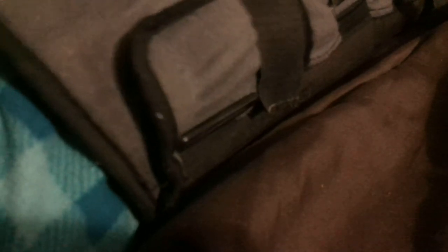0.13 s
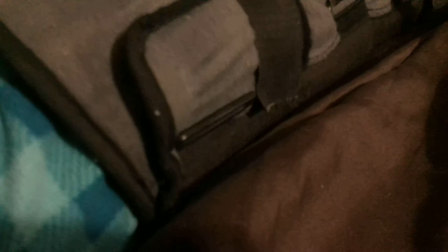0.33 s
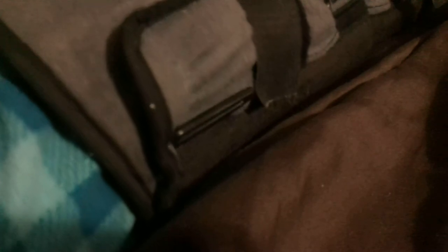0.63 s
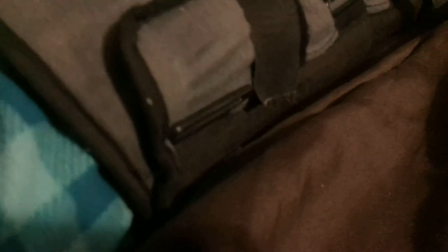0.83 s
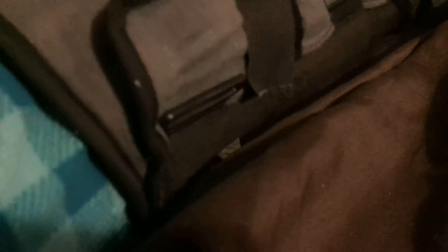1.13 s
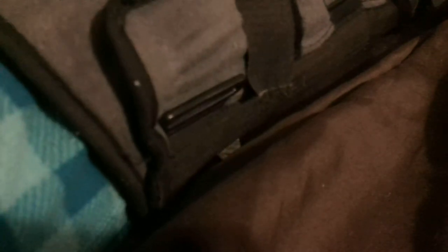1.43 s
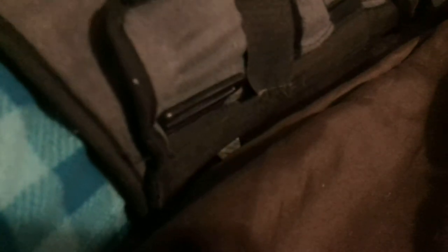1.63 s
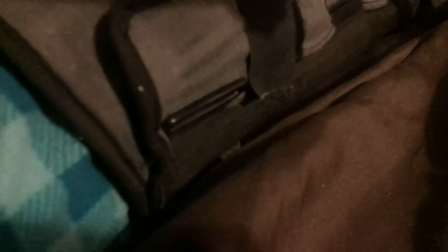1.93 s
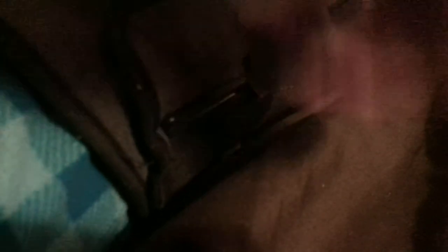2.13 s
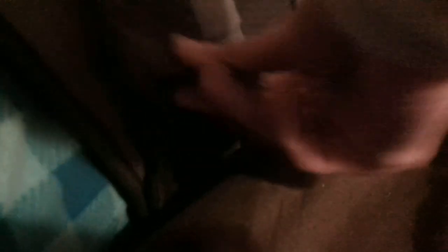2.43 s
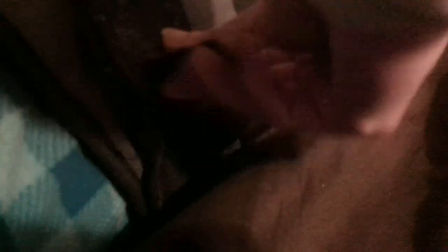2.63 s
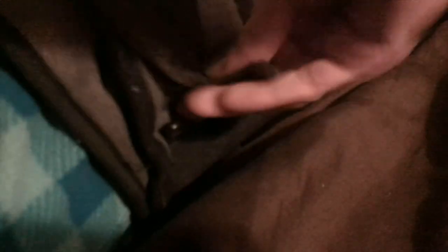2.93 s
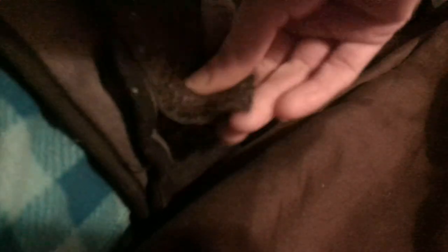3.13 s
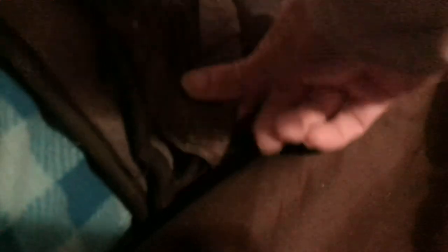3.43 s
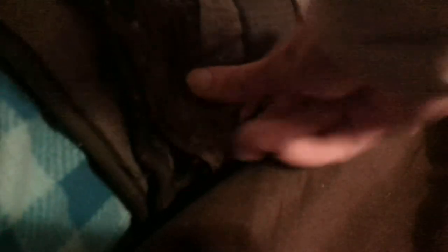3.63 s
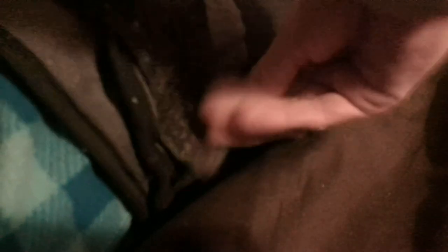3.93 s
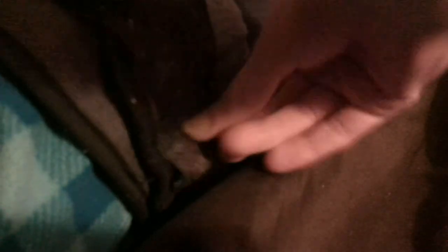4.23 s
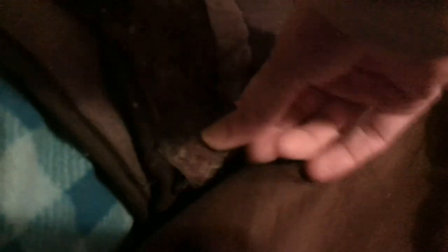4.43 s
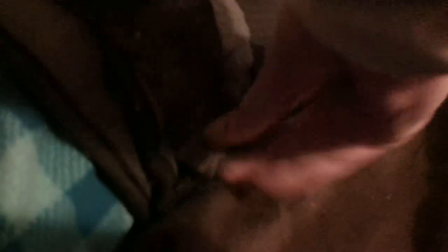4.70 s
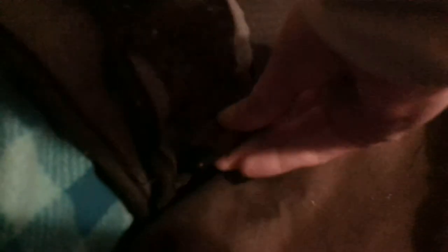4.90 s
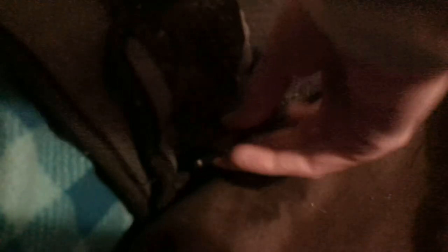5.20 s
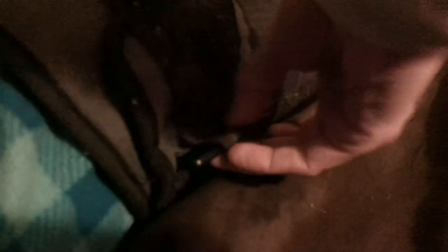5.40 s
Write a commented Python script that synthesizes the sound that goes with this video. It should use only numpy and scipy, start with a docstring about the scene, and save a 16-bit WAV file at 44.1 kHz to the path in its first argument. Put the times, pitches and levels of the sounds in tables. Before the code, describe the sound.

Starts mid-rip: a dense hook-and-loop rasp ends in a tenth of a second. Soft cloth rubbing and muted bumps of a padded leg brace follow, with a few faint ticks. A sharp little cluster of snaps comes before three seconds, then the strap is peeled in short crackling tugs. Close stereo microphone, action drifting right, small soft room with faint hum.

```python
"""First the end of a quick rip is heard: hooks part so densely that they fuse into a rasp.
Then cloth shifts softly and a padded leg brace bumps, made of low noise and short damped tones.
Last, a hook-and-loop strap is peeled in short tugs: sharp pulses are dry snaps over a fibre-noise rasp.
The sounds lie close and to the right in a small, soft room, over faint air and a mains hum."""
import sys
import numpy as np
from scipy import signal
from scipy.fft import rfft, irfft, next_fast_len
from scipy.io import wavfile
from scipy.ndimage import map_coordinates

SR = 44100
rng = np.random.default_rng(int(sys.argv[2]) if len(sys.argv) > 2 else 0)


def waveform_to_disk(signal):
    """Save audio, clipped to [-1, 1], as 16-bit WAV at the path in sys.argv[1]."""
    frames = np.transpose(np.atleast_2d(signal))
    scaled = np.clip(frames, -1, 1) * 32767
    samples = np.round(scaled).astype(np.int16)
    wavfile.write(sys.argv[1], SR, samples)


N = 245195  # length in samples

# Levels in the tables are settings before the later trims and stereo balance.
# colour of the rip: pitch_hz, level_db (relative, per Hz)
RIP_COLOUR_POINTS = [(40, 8), (140, -5), (240, 7), (500, 2), (800, -1), (1200, -7.5), (1700, -1), (2400, 1),
                     (3300, 0), (5000, 1), (10000, 1), (15000, 1)]
# shifts of the padded brace on the bedding: start_s, length_s, level_db, swell_db (start to end)
BRACE_HEAVES = [(0, 0.18, -49, -12), (.78, 0.24, -64, -3), (1.35, 0.05, -62.5, 6), (2.14, 0.027, -60.5, -2)]
# soft bumps on the brace: start_s, level_db, pitch_hz, t60_s (time to fall by 60 dB)
BRACE_BUMPS = [(0.244, -43, 232, 0.033), (0.248, -44, 33.9, 0.24), (0.546, -46, 85, 0.074),
               (0.7, -39.5, 148, 0.026), (0.911, -43, 340, .03), (1.056, -47.5, 157, 0.058),
               (1.381, -52, 149, 0.026), (1.445, -49, 206, .04), (1.598, -48.5, 337, 0.051),
               (2.15, -40, 169, 0.032), (3.36, -44, 440, 0.023), (4.782, -55, 352, 0.089),
               (5.495, -48.5, 304, 0.079)]
# strokes of strap and cloth over each other: start_s, length_s, level_db, swell_db (start to end)
RUB_STROKES = [(.703, 0.021, -49.5, 1), (.765, 0.025, -48, 0), (.81, 0.15, -54, -4),
               (1.055, 0.034, -52.5, -7), (1.33, 0.029, -58.5, -10), (1.386, 0.18, -56, -9.5),
               (1.585, 0.011, -42, 3.5), (1.68, 0.2, -57.5, -9), (1.97, 0.11, -53.5, 0),
               (2.1, .19, -61, -9.5), (2.42, 0.072, -59.5, 1.5), (2.67, 0.11, -55, 0),
               (2.87, .06, -58, 3.5), (3.04, 0.1, -56, -12), (3.275, .1, -50, 3.5), (3.42, 0.15, -60, 3),
               (3.66, 0.14, -50, -1), (3.85, 0.11, -48, -2.5), (4.18, 0.041, -52, 1),
               (4.368, 0.075, -48.5, -7), (4.719, .01, -51, 0), (4.75, 0.11, -50, 2.5),
               (5.008, 0.038, -47, -5), (5.08, 0.062, -55, -6), (5.26, 0.079, -61, 0),
               (5.43, 0.085, -51, 2.5)]
# colour of the soft cloth: pitch_hz, level_db (relative, per Hz)
CLOTH_COLOUR = [(60, -18), (300, -1.5), (550, -3.5), (1100, -2), (1500, 0), (1850, -4), (2400, 4),
                (3100, 0), (5500, 2), (9000, 1.5), (12500, 2), (15500, -0.5)]
# colour of the strap's crisp pile: pitch_hz, level_db (relative, per Hz)
PILE_COLOUR = [(60, -8), (350, -2.5), (700, -11), (1200, -5.5), (2000, -5), (2800, -1), (4200, 1),
               (5500, -3), (7500, -1.5), (10000, -6.5), (12000, -1), (15500, -3.5)]
# colour of the still air: pitch_hz, level_db (relative, per Hz)
AIR_COLOUR = [(15, -30), (26, 5), (41, -4), (62, -9.5), (85, -4), (125, -8.5), (185, -22), (270, -10),
              (400, -18), (650, -21), (1200, -28), (2630, -24.5), (7500, -35), (10000, -30), (15000, -29)]
# the loudest single hooks letting go: start_s, level_db, brightness_db (treble over body)
LOUD_HOOKS = [(0.1157, -9, 0), (0.2578, -33, -23), (0.4616, -28, 7), (0.713, -26, -31), (0.7847, -17.5, -3),
              (0.915, -20, 8), (0.9391, -19.5, -3), (0.9455, -18.5, -9), (1.0537, -24, 0), (1.305, -31, -2),
              (1.3213, -31.5, -1), (1.4215, -22.5, -5), (1.5851, -20, 8), (1.5996, -14, 10),
              (1.7577, -26.5, -2), (1.796, -26.5, 10), (1.818, -24, -7), (2.0264, -24.5, -10),
              (2.7131, -25, -2), (2.7369, -10, 4.5), (2.742, -15, -10), (2.7439, -6.5, 0.5),
              (2.7613, -18, -17), (2.7781, -25, 21), (2.9314, -21, 6), (3.0503, -16.5, 7.5),
              (3.2022, -23.5, 22), (3.2446, -12, -3.5), (3.2667, -17, 10), (3.2888, -16.5, 12),
              (3.2947, -13, 11), (3.3031, -11.5, 12), (3.3413, -14.5, 13), (3.3842, -17.5, 7),
              (3.554, -26.5, 4), (3.587, -19, 9), (3.5952, -13.5, 9.5), (3.6466, -17.5, 8),
              (3.6604, -12.5, 9), (3.666, -7.5, 8), (3.6792, -10.5, 11), (3.691, -12, 5), (3.6964, -14, 12),
              (3.7092, -11.5, 12), (3.712, -7.5, 11), (3.7392, -16, 9), (3.774, -17, 20),
              (3.7827, -3.5, 10), (3.845, -9, 1), (3.85, -10, -4), (3.8569, -13.5, 4), (3.8647, -7.5, 14.5),
              (3.8773, -7.5, 4), (3.8864, -15.5, 2), (3.9736, -16, 13), (4.144, -18.5, -6),
              (4.1878, -19, 11), (4.2223, -19, 5.5), (4.2488, -25, 15), (4.339, -14, 22),
              (4.371, -11.5, -3), (4.3907, -17, 12), (4.3958, -12, 10), (4.402, -11, 11),
              (4.4185, -8.5, 5.5), (4.4308, -9.5, 17), (4.4415, -17.5, 14), (4.4522, -13, 11),
              (4.5518, -24, -3), (4.586, -27, 11), (4.7202, -14, 5.5), (4.914, -21, 8), (4.9286, -19.5, 11),
              (5.0056, -18.5, 18), (5.015, -16.5, 19), (5.0822, -11, 13), (5.2415, -18.5, 8),
              (5.3214, -21.5, 7), (5.3579, -10.5, -0.5), (5.406, -19.5, 8), (5.421, -17, 14),
              (5.4505, -21.5, 16), (5.4775, -18.5, 15)]
# tugs on the strap, each freeing a spray of small hooks: start_s, length_s, level_db
STRAP_TUGS = [(1.419, 0.2, -33.5), (3.259, .11, -25), (3.652, .15, -25), (3.932, 0.064, -31),
              (4.147, .1, -33.5), (4.363, .07, -23.5), (4.52, .2, -34), (5.0, 0.067, -29),
              (5.281, 0.15, -31.5), (5.431, 0.059, -29.5)]
# where the hand is: time_s, balance_db (left minus right)
HAND_PLACE = [(0, -0.5), (.9, 1.5), (1.6, -1), (2.7, -3.5), (3.3, -7), (3.8, -4.5), (4.5, -7), (5.56, -6.5)]
# how alike left and right are: pitch_hz, likeness (no unit, 1 = the same)
LEFT_RIGHT_LIKENESS = [(60, 0.73), (300, 0.74), (1000, 0.59), (3000, 0.36), (8000, 0.42), (15000, 0.35)]
# how fast the room's tail fades: pitch_hz, t60_s (time to fall by 60 dB)
ROOM_FADE = [(150, 0.31), (1500, 0.34), (6000, 0.29), (15000, 0.24)]

# the rip, already under way: when the strap comes free, level, growth as the pull speeds up, fade time
RIP_END_S, RIP_DB, RIP_SWELL_DB, RIP_RELEASE_S = 0.1, -24.5, 3.5, 0.0074
HEAVE_ATTACK_S, HEAVE_RELEASE_S, HEAVE_REST_DB = 0.029, 0.042, -76.5  # rest: faint rumble floor
STROKE_ATTACK_S, STROKE_RELEASE_S = 0.012, 0.02  # time constants
RESTING_DB, HOLDING_DB = -69, -63.5  # faint rubbing between strokes: before and after the fingers grip
SNAP_DB, SNAP_SHARE = -2.5, 0.055  # 6-10 kHz: offset from the hook's level; how far it follows brightness
SPRAY_SPREAD_DB, SPRAY_BRIGHT_DB, SPRAY_BRIGHT_SPREAD_DB = 6, 7, 3
PORT_LAG_S = 3 / SR  # how much later the left side hears the hand
TOP_HZ = 16100  # band limit


def amp(db):
    """Turn decibels into gain."""
    return 10 ** (np.asarray(db) / 20)


def unit(x):
    """Scale to an average strength (rms) of 1."""
    return x / np.sqrt(np.mean(x ** 2) + 1e-20)


def along(points, hz):
    """Read (Hz, value) points on a log frequency axis, as pitch is heard."""
    f, v = np.transpose(points)
    return np.interp(np.log(hz + 1), np.log(f + 1), v)


def curve(rows):
    """Join (seconds, value) rows with straight lines, one value per sample."""
    return np.interp(np.arange(N) / SR, *np.transpose(rows))


def wobble(rate):
    """Make a smooth random curve with `rate` random points a second."""
    points = rng.standard_normal(int(N * rate / SR) + 4)
    return map_coordinates(points, [np.arange(N) * rate / SR])


def filtered(x, response):
    """Multiply each frequency of x by response(hz), which may also delay it."""
    m = next_fast_len(N + SR // 2)
    spectrum = rfft(x, m) * response(np.fft.rfftfreq(m, 1 / SR))
    return irfft(spectrum, m)[..., :N]


def stereo(pair, colour):
    """Blend two unrelated signals into a coloured left and right of rms 1, most alike in the bass."""
    def response(hz):
        turn = np.arccos(np.clip(along(LEFT_RIGHT_LIKENESS, hz), -1, 1)) / 2
        return amp(along(colour, hz)) * [np.cos(turn), np.sin(turn)]

    mid, side = filtered(pair, response)
    return unit(np.array([mid + side, mid - side]))


def placed(pair, extra_db, lag_s):
    """Put the hand to the right: its sound reaches the left side later and weaker."""
    lean = amp(np.array([[.5], [-.5]]) * (curve(HAND_PLACE) + extra_db))
    late = filtered(pair, lambda hz: np.exp(-2j * np.pi * hz * np.array([[lag_s], [0]])))
    return late * lean / np.sqrt(np.mean(lean ** 2, axis=0))


def patchy(x, depth_db, size=512):
    """Keep shifting the colour as other folds of the fabric come into play."""
    z = signal.stft(x, nperseg=size)[2]
    blur = np.outer(np.hanning(17), np.hanning(15))
    patches = signal.fftconvolve(rng.standard_normal(z.shape[1:]), blur, "same")
    shifted = z * amp(depth_db * unit(patches))
    return unit(signal.istft(shifted, nperseg=size)[1][:, :N])


def fibres(colour, rate, spread_db, clump_db, smooth, patch_db):
    """Scatter countless uneven fibre slips, bunched in time, over a smooth sliding hiss."""
    slips = (rng.random(N) < rate / SR) * amp(spread_db * rng.uniform(-0.62, 1, N))
    grains = unit(slips * rng.choice([-1, 1], (2, N)))
    grains = grains + smooth * rng.standard_normal((2, N))
    bunched = stereo(grains, colour) * amp(clump_db * wobble(260))
    return patchy(bunched, patch_db)


def gestures(rows, attack_s, release_s):
    """Gain of a series of movements: each sets in, swells or sags steadily, and dies away."""
    t, power = np.arange(N) / SR, np.zeros(N)
    for start, length, db, swell_db in rows:
        progress = np.clip((t - start) / length, 0, 1)
        before, after = np.minimum(t - start, 0), np.maximum(t - start - length, 0)
        edges = np.exp(before / attack_s - after / release_s)
        power += (edges * amp(db + swell_db * (progress - .5))) ** 2
    return np.sqrt(power)


def rip():
    """A fast pull: hooks part so densely that they fuse into a rasp."""
    rasp = fibres(RIP_COLOUR_POINTS, rate=7000, spread_db=1.0, clump_db=1.0, smooth=0.52, patch_db=1.0)
    pull = gestures([(0.00012, RIP_END_S, RIP_DB, RIP_SWELL_DB)], STROKE_ATTACK_S, RIP_RELEASE_S)
    return pull * placed(rasp, extra_db=-3, lag_s=PORT_LAG_S)


def brace(attack_s=0.0017, dullness=0.61):
    """The padded shell heaves with a low rumble, and answers each bump with a few damped cycles."""
    bumps, t = np.zeros(N + SR), np.arange(SR // 4) / SR
    for start, db, hz, t60 in BRACE_BUMPS:
        lowpass = signal.butter(2, 2 * hz, fs=SR, output="sos")
        padding = unit(signal.sosfilt(lowpass, rng.standard_normal(len(t))))
        ring = np.sin(2 * np.pi * hz * t) + dullness * padding
        fade = amp(db - 60 * t / t60) * (1 - np.exp(-t / attack_s))
        bumps[round(start * SR):][:len(t)] += fade * ring
    colour = [(12, -12), (30, 1.5), (70, -3.5), (150, -8), (400, -16), (1500, -52), (5000, -100)]
    rumble = stereo(rng.standard_normal((2, N)), colour)
    shifting = np.hypot(gestures(BRACE_HEAVES, HEAVE_ATTACK_S, HEAVE_RELEASE_S), amp(HEAVE_REST_DB))
    return (bumps[:N] + shifting * rumble) * amp([[-2], [1.8]])  # a little stronger on the right


def rubbing(grip_s=3.05):
    """Soft cloth slides first, nearly in front; once the fingers grip, the strap's crisp pile takes over."""
    grip = curve([(grip_s - .3, 0), (grip_s + 0.39, 1)])
    cloth = fibres(CLOTH_COLOUR, rate=2500, spread_db=7.5, clump_db=2.0, smooth=0.82, patch_db=2.0)
    pile = fibres(PILE_COLOUR, rate=1500, spread_db=7, clump_db=2.5, smooth=0.54, patch_db=2.0)
    soft = amp(-0.22) * np.sqrt(1 - grip) * placed(cloth, extra_db=-2.5, lag_s=PORT_LAG_S / 2)
    crisp = amp(-1.83) * np.sqrt(grip) * placed(pile, extra_db=-1, lag_s=PORT_LAG_S)
    faint = amp(RESTING_DB + (HOLDING_DB - RESTING_DB) * grip)
    sliding = np.hypot(gestures(RUB_STROKES, STROKE_ATTACK_S, STROKE_RELEASE_S), faint)
    return sliding * (soft + crisp)


def background(hum_hz=240, hum_db=-73, air_db=-67):
    """Still room air is coloured noise; the mains hum is one tone, slightly unsteady in level and phase."""
    waver = amp(1.2 * wobble(4))
    phase = 2 * np.pi * hum_hz * np.arange(N) / SR + 0.15 * wobble(3.4)
    hum = amp(hum_db) * waver * np.sin(phase)
    return hum + amp(air_db) * stereo(rng.standard_normal((2, N)), AIR_COLOUR)


def spray(count=11):
    """Small hooks give way at uneven moments through each tug: rows like those of LOUD_HOOKS."""
    rows = []
    for start, length, db in STRAP_TUGS:
        moments = start + length * (np.arange(count) + rng.random(count)) / count
        strength, colour = rng.standard_normal((2, count))
        levels = db + SPRAY_SPREAD_DB * strength
        rows += zip(moments, levels, SPRAY_BRIGHT_DB + SPRAY_BRIGHT_SPREAD_DB * colour)
    return rows


def dying_noise(t, t60_s):
    """Noise that fades by 60 dB in t60_s, as scattered or shivering motion dies out."""
    return unit(rng.standard_normal((2, len(t))) * amp(-60 * t / t60_s)) / np.sqrt(len(t))


def hooks(scatter=0.97, scatter_t60_s=0.0025, flutter=0.37, flutter_t60_s=0.012, ripple_db=1.5,
          neighbour_db=-13, apart_s=.0014, size=1024):
    """Each hook flicks free in one sharp pulse; the strap scatters it and shivers for a moment."""
    out = np.zeros((2, N + 2 * size))
    lead = size // 4  # room for neighbours that come early
    t, hz = np.arange(size - lead) / SR, np.fft.rfftfreq(size, 1 / SR)
    for start_s, db, bright_db in LOUD_HOOKS + spray():
        pulse = (t == 0) + scatter * dying_noise(t, scatter_t60_s) + flutter * dying_noise(t, flutter_t60_s)
        pulse = np.pad(pulse / np.linalg.norm(pulse[1]), ((0, 0), (lead, 0)))
        # weaker neighbouring hooks give way just before or just after
        delays = rng.normal(0, apart_s, size=3)
        neighbours = sum(np.roll(pulse, round(d * SR), axis=1) for d in delays)
        pulse = pulse + amp(neighbour_db) * neighbours
        # bright hooks have less body and more tick
        body_db, tick_db = db - bright_db / 2, db + bright_db / 2
        snap_db = db + SNAP_DB + SNAP_SHARE * bright_db
        colour = [(100, body_db - 11), (400, body_db - 11.5), (900, body_db - 6.5),
                  (1600, body_db), (4000, body_db),
                  (5600, snap_db + 2.5), (8000, snap_db + 3.5), (10000, snap_db - 0.5),
                  (11600, tick_db), (16000, tick_db)]
        # every hook has broad resonances of its own
        ripple = ripple_db * map_coordinates(rng.standard_normal(32), [hz / 900], mode="mirror")
        coloured = irfft(rfft(pulse, size) * amp(along(colour, hz) + ripple), size)
        first = round(start_s * SR) - lead
        out[:, first:first + size] += coloured
    return amp(-1.5) * placed(out[:, :N], extra_db=-4.5, lag_s=PORT_LAG_S)


def room(x, count=2048):
    """Add a short, soft tail of fading noise, a little different for sounds at different moments."""
    wet = np.zeros((2, N))
    for k in range(4):
        hz, _, z = (noise := signal.stft(rng.standard_normal((2, SR // 3)), SR, nperseg=256))
        fade = amp(-60 * noise[1] / along(ROOM_FADE, hz)[:, None])
        tail = signal.istft(z * fade, SR, nperseg=256)[1]
        # the tail starts 1/300 s after the direct sound
        tail = np.pad(tail / np.linalg.norm(tail[0]), ((0, 0), (SR // 300, 0)))
        turn = np.arange(N) // count % 4 == k  # the four tails take turns, `count` samples each
        wet += signal.fftconvolve(x[1:] * turn, tail, axes=1)[:, :N]  # fed by the right side
    return wet


def scene():
    """Near snaps stay almost dry; the rip and the rubbing reach the room more."""
    snaps, tear, rub = hooks(), rip(), rubbing()
    wet = room(amp(-20.5) * snaps + amp(-14.5) * tear + amp(-13.5) * rub)
    return snaps + tear + rub + wet + brace() + background()


def record(dry):
    """Cut off steeply nearly everything above the band limit."""
    return filtered(dry, lambda hz: 1 / np.sqrt(1 + (hz / TOP_HZ) ** 240))


dry = scene()
out = record(dry)
waveform_to_disk(out)
```